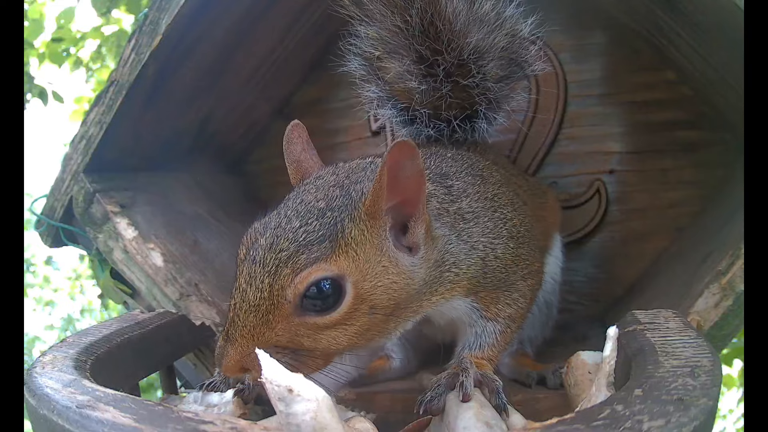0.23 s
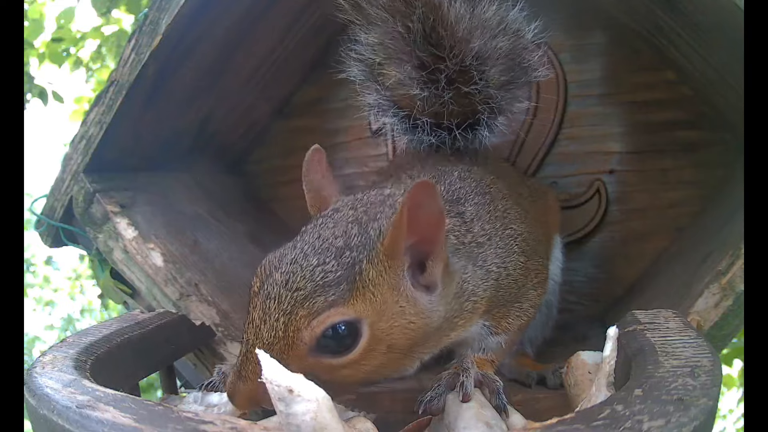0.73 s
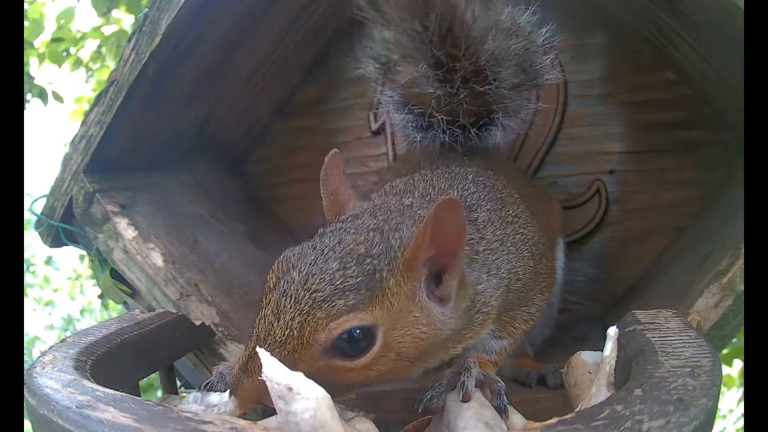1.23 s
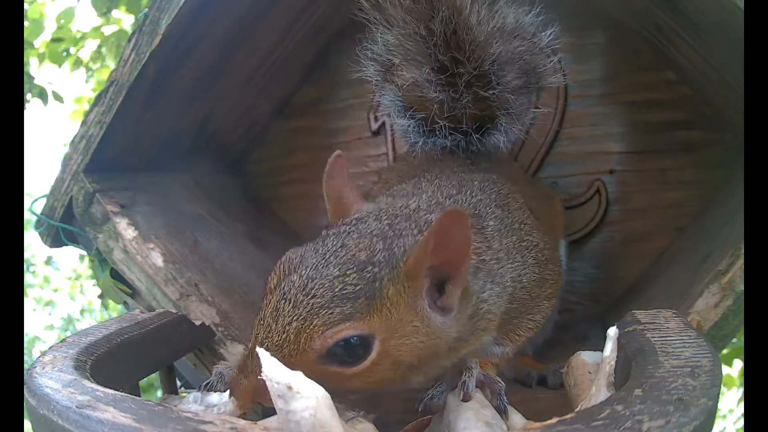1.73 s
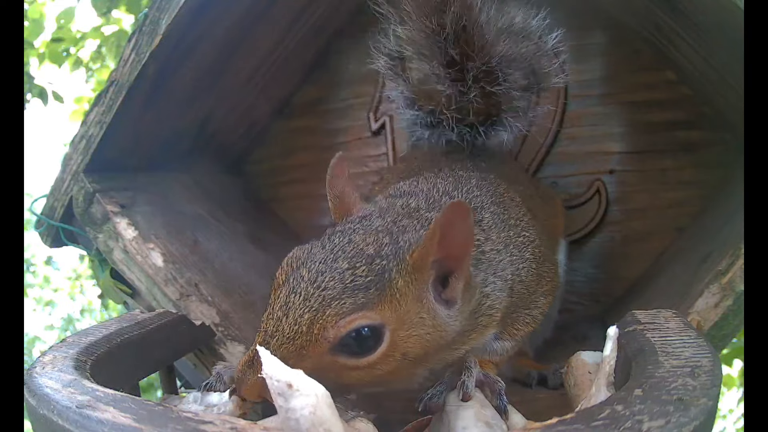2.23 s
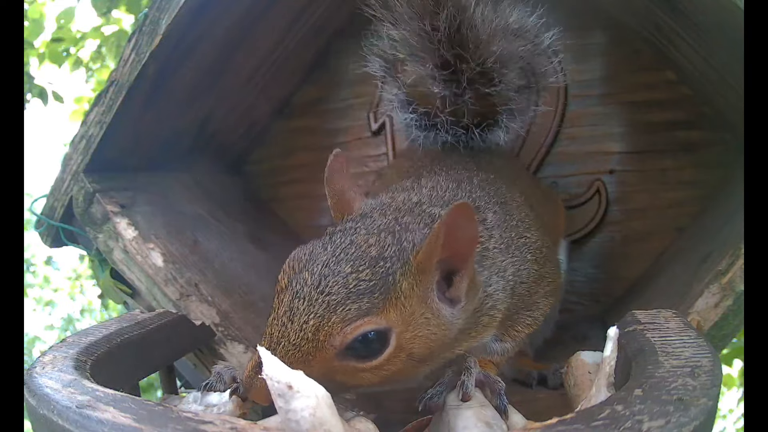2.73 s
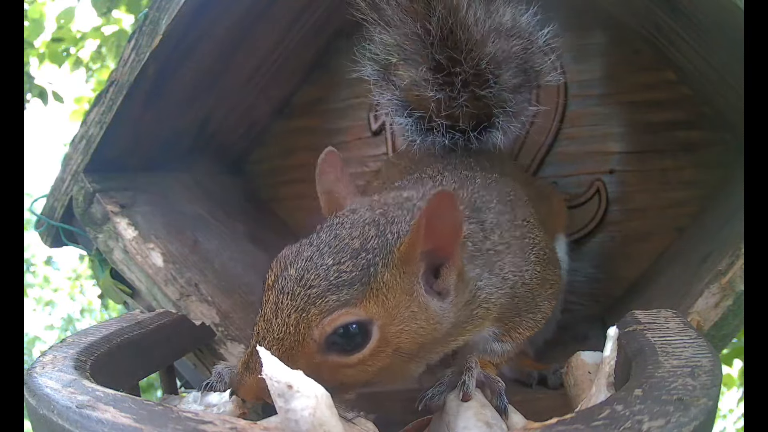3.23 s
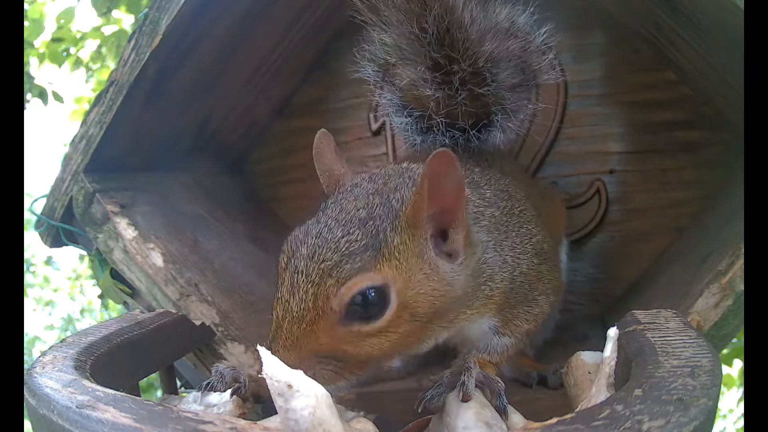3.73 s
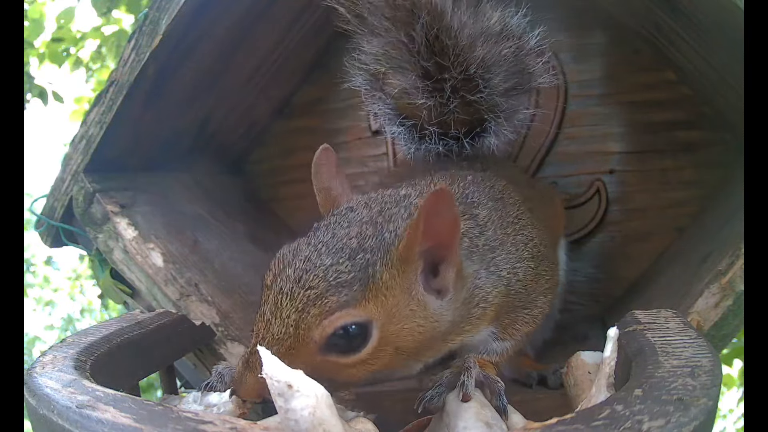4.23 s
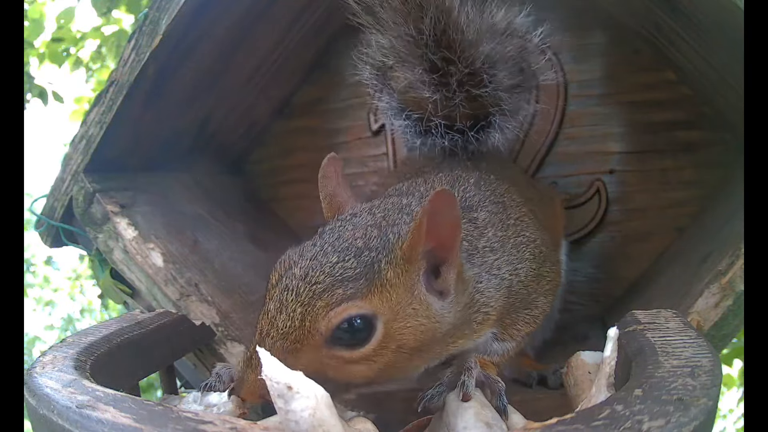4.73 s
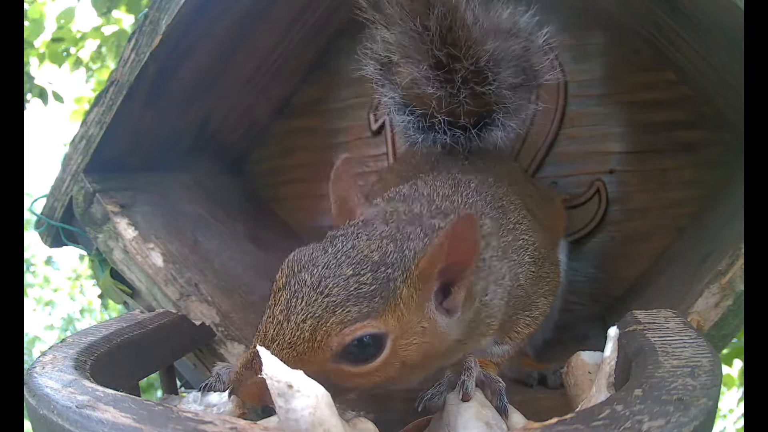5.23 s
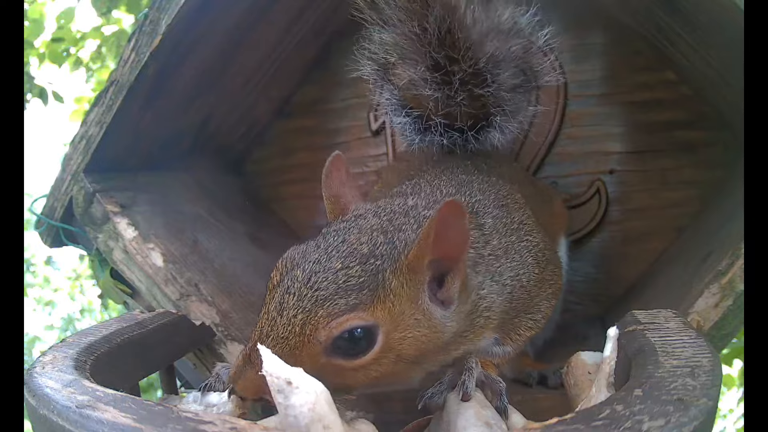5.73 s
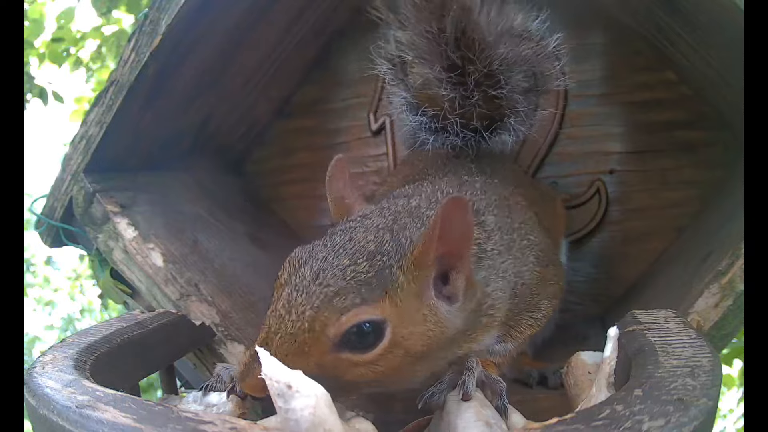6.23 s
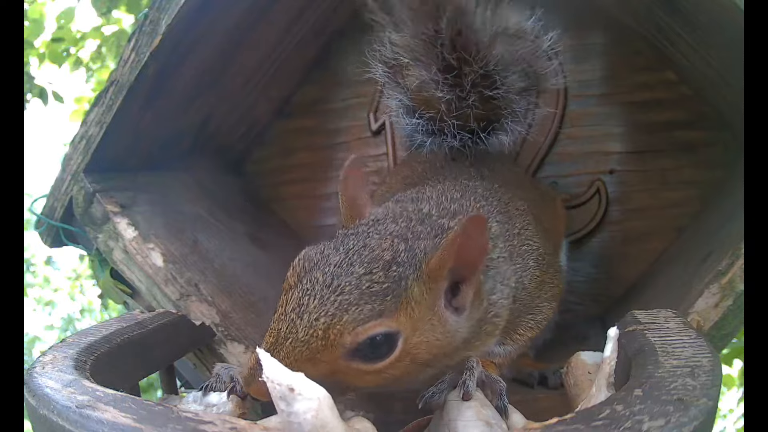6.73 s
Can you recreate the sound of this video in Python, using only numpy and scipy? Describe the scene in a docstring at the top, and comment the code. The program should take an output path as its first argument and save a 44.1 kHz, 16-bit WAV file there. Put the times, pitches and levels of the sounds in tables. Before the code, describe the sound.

A squirrel is heard very close, inside a wooden nest box in a quiet garden. It opens with a clipped, harsh bark right at the start. From about 0.7 seconds its teeth crack and slip on something hard, making dry, irregular clicks with soft thuds through the wall, and a few very faint short hisses. The clicks build until a brief hiss leads into a loud, rasping bark from 2.9 to 3.4 seconds. After a lull, gnawing resumes at 4.3 seconds, sharper now, with a soft wheezy hiss until 4.9 and tiny fibre snaps. Another loud, raspy bark runs from 5.5 to 5.8 seconds. Stronger cracks continue until about 7 seconds, with a longer hiss from 6.1 to 6.7. Everything has a slightly boxy colour. A faint rumble, air noise and hum swell when the squirrel is loud, then sink back.

```python
"""Inside a wooden nest box in a quiet garden, a grey squirrel gnaws, hisses and barks close by.
Three harsh barks: two vocal folds break from one tone into a rasp. Teeth crack and slip on something
hard; fibres snap and the wall thuds. Box and microphone resonances colour the barks and cracks.
Hisses are air forced through a narrowed throat. Behind: faint garden echoes, and rumble,
air noise and hum that swell while the squirrel is loud."""
import sys
import numpy as np
from scipy import signal
from scipy.fft import rfft, irfft, next_fast_len
from scipy.io import wavfile
from scipy.ndimage import uniform_filter1d, minimum_filter1d

SR = 44100
rng = np.random.default_rng(int(sys.argv[2]) if len(sys.argv) > 2 else 0)


def unload_wav(signal):
    """Save mono or channel-first audio to the path in sys.argv[1] as 16-bit WAV at rate SR, clipped to [-1, 1]."""
    wavfile.write(
        sys.argv[1],
        SR,
        np.round(np.clip(np.atleast_2d(signal).T, -1, 1) * 32767).astype(np.int16),
    )


N = 307369
TIME_S = np.arange(N) / SR

# pitch curve per bark: (time [s], pitch [Hz])
BARK_PITCH = [
    [(-.008, 383), (.022, 414), (.04, 430), (.053, 465)],
    [(2.936, 360), (2.962, 458.2), (3.045, 507.6), (3.09, 459.6), (3.125, 501.5), (3.22, 470.1),
     (3.28, 436), (3.36, 467.1), (3.446, 423.6)],
    [(5.465, 369.8), (5.485, 439.4), (5.535, 434.7), (5.58, 494.6), (5.635, 516.9), (5.70, 480.8),
     (5.745, 433.6), (5.785, 441.5), (5.828, 398.5)],
]
# effort curve per bark: (time [s], level [dB], middle share [dB], upper share [dB], top share [dB])
BARK_EFFORT = [
    [(0.006, -20, -2.5, -5.5, -14.5), (0.038, -16, -1, -8, -20), (0.048, -17, -17.5, 3, -29.5)],
    [(2.945, -19.5, -11.5, -3, -22), (2.955, -15.5, -5.5, -6.5, -21), (2.997, -18, -4, -4.5, -18),
     (3.051, -14.5, -7, -2.5, -22), (3.183, -11, -2.5, -3.5, -18.5), (3.207, -11.5, -7.5, -5, -6),
     (3.311, -11, -5.5, -4, -16.5), (3.413, -14.5, -6, -4, -12), (3.44, -18, -10.5, -4, -23)],
    [(5.47, -16.5, -6, -4.5, -19), (5.48, -17, -4, -6, -18), (5.55, -14.5, -2, -10, -22),
     (5.596, -11.5, -0.5, -7, -21.5), (5.768, -10, -5.5, -3, -14.5), (5.8, -12, -4, -5.5, -14.5),
     (5.82, -21, -6.5, -7.5, -15)],
]
# box and microphone resonances that colour the barks: (frequency [Hz], width [Hz], gain [dB])
BARK_RESONANCES = [(274, 68, -29.5), (390, 210, -21.5), (750, 130, -16), (985, 190, -11.5),
                   (1197, 83, -17.5), (1770, 270, 2.5), (2246, 340, -2), (2570, 200, -1), (3176, 470, -1),
                   (3583, 270, 4.5), (4220, 270, -11.5), (5415, 620, -34.5), (6270, 750, -49.5)]
# tooth cracks: (time [s], peak [dB], relative brightness [dB], wall thud level [dB])
CRACKS = [(0.7086, -53, -15, -48), (0.8624, -39.5, -27, -49.5), (0.9004, -32.5, -14, -45),
          (1.0936, -31.5, -37, -45), (1.272, -34, -19, -49), (1.453, -33.5, -27, -51),
          (1.6014, -45.5, -25, -56.5), (1.917, -35, -32, -48.5), (2.0488, -31.5, -36, -57),
          (2.0725, -33, -31, -44), (2.2334, -24.5, -23, -46.5), (2.409, -22, -4.5, -66.5),
          (2.5592, -28.5, -18.5, -43), (2.614, -24.5, -1.5, -46), (2.7544, -19, -14.5, -41.5),
          (2.8673, -32, -17.5, -47), (3.5399, -50.5, -24, -53), (4.3361, -26, -15.5, -48),
          (4.4622, -30, -17, -52.5), (4.6455, -23, -18, -49), (4.8174, -23, -9.5, -54),
          (4.8439, -14.5, -8.5, -46.5), (4.8698, -17, -5, -42.5), (5.0175, -18, -3.5, -50),
          (5.0317, -24.5, -5, -43.5), (5.1658, -32, -25.5, -52), (5.225, -20, -18.5, -44.5),
          (5.3617, -37, -13, -53), (5.4068, -14.5, -4.5, -35), (5.9243, -13.5, -15, -39.5),
          (5.9397, -22.5, -20, -38), (6.0692, -19, -17.5, -49.5), (6.0905, -22, -24, -41.5),
          (6.2474, -22.5, -14, -39), (6.4411, -13, -7.5, -40.5), (6.5944, -19, -19.5, -46),
          (6.6537, -13, -1, -36), (6.785, -29, 0, -45), (6.8104, -12, -20.5, -37), (6.943, -22, -20, -37)]
# tooth slips around a crack: (offset [steps], base peak [dB])
TOOTH_SLIPS = [(-1.8, -48.5), (-1, -42.5), (1, -44.5)]
# gnawing spells: (start [s], end [s], base grinding level [dB], base tick peak [dB])
GNAW_BOUTS = [(1.148, 2.396, -68.5, -55), (4.455, 6.969, -63.5, -45)]
# box and microphone resonances that ring briefly after each crack: (frequency [Hz], gain [dB], t60 [s])
CLICK_MODES = [(926, -12, 0.041), (1145, 1, 0.0062), (1614, 2, 0.027), (1796, 5, 0.023), (2213, 2.5, 0.015),
               (2592, 1, 0.026), (3330, -4.5, 0.0017), (3575, 8, 0.014), (4157, -6, 0.019),
               (4370, -15.5, 0.021)]
# snapping fibres: (time [s], peak [dB])
FIBRE_SNAPS = [(.927, -56), (4.818, -54), (5.035, -38.5), (5.925, -48), (6.441, -46)]
# box wall resonances: (frequency [Hz], width [Hz], gain [dB])
WALL_MODES = [(356, 60, -11), (437.4, 76, 2.5), (490, 236, -8), (800, 640, -24)]
# hisses: (start [s], end [s], level [dB], centre [Hz], drop one octave off centre [dB])
HISS_EVENTS = [(1.11, 1.217, -66, 3380, 120), (1.48, 1.611, -62.5, 2750, 63),
               (1.967, 2.051, -49.5, 2490, 49), (2.352, 2.446, -50.5, 2580, 26),
               (2.866, 2.982, -41, 2497, 5), (4.422, 4.88, -40, 2900, 4.5), (6.069, 6.687, -36.5, 2900, 1)]
# hiss spectrum: (frequency [Hz], relative density [dB])
HISS_SPECTRUM = [(410, -62), (700, -19.5), (899, -32), (1180, -32.5), (1960, -10.5), (2140, -12.5),
                 (2380, -4.5), (2780, -9), (3060, -5), (3430, -5), (3530, -3), (4370, -35), (4630, -38.5),
                 (7000, -50.5), (9100, -85.5), (15400, -120)]
# still-air spectrum: (frequency [Hz], relative density [dB])
AIR_SPECTRUM = [(20, -16), (40, -5.5), (75, -9), (105, -18), (160, -27.5), (250, -25), (450, -32.5),
                (800, -26), (1300, -27.5), (2500, -26), (3400, -27.5), (4400, -38), (7400, -57.5)]
# hum tones: (frequency [Hz], base rms level [dB])
HUM_TONES = [(118.6, -77), (565, -89)]

CLEAR_ROUGHNESS, RASP_ROUGHNESS = .24, .68


def barks():
    """Three harsh barks from the vocal folds."""
    out = np.zeros(N)
    for pitch, effort in zip(BARK_PITCH, BARK_EFFORT):
        add(out, pitch[0][0], bark(pitch, effort))
    return out


def bark(pitch, effort, turbulence=.45, churn_hz=1400, attack_s=.009, release_s=.0058):
    """Fold pulses and turbulent air, coloured by box and microphone resonances."""
    t = np.arange(pitch[0][0], pitch[-1][0], 1 / SR)
    lead_hz, loose_hz, roughness = fold_tuning(pitch, t)
    level_db, *shares_db = curves_at(effort, t)
    pulses, lead_phase = fold_pulses(lead_hz, loose_hz, roughness)
    rush = turbulence * rng.standard_normal(len(t)) * (1 + np.cos(lead_phase))  # air at each opening
    churn = 1.5 * low_pass(rng.standard_normal(len(t)), churn_hz, order=4)
    voice = resonate(pulses + roughness * (rush + churn), BARK_RESONANCES)
    voice = band_balance(box_reflections(voice), shares_db)
    gate = ramp((t - t[0]) / attack_s) * ramp((t[-1] - t) / release_s)
    return hold_power(voice, 400) * from_db(level_db) * gate


def fold_tuning(pitch, t, catch_s=.02, clear_s=.028, break_s=.03, relock_s=.025,
                low_hz=420, high_hz=561, flip_at_s=.18, flip_s=.06,
                squeal_at_s=3.321, squeal_s=.028, squeal_hz=583.6):
    """The folds catch, clear, split into two pitches and relock; once they lock into a squeal."""
    lead_hz, = curves_at(pitch, t)
    age_s = t - t[0]
    squeal = np.exp(-(2 * (t - squeal_at_s) / squeal_s) ** 4)
    apart = ramp((age_s - clear_s) / break_s) * ramp((t[-1] - t) / relock_s) * (1 - squeal)
    lead_hz += squeal * (squeal_hz - lead_hz)
    free_hz = low_hz + (high_hz - low_hz) * ramp((age_s - flip_at_s) / flip_s + .5)  # register flip
    free_hz *= 1 + .04 * wobble(len(t), 14)
    loose_hz = lead_hz + apart * (free_hz - lead_hz)
    catch = ramp(1 - (age_s / catch_s) ** 2)
    roughness = CLEAR_ROUGHNESS + np.maximum(apart, catch) * (RASP_ROUGHNESS - CLEAR_ROUGHNESS)
    return lead_hz, loose_hz, roughness


def fold_pulses(lead_hz, loose_hz, roughness, wander=.01, jitter=.026, shimmer=.7, coupling=.05):
    """Two unsteady folds pull each other's closures early or late; returns pulses and lead phase."""
    def phase(hz):
        cycles = np.cumsum(hz * (1 + wander * roughness * wobble(len(hz), 70))) / SR
        return 2 * np.pi * (cycles + jitter * roughness * wobble(len(hz), 170))

    def closures(own, other):
        pulled = own + 2 * np.pi * coupling * roughness * np.sin(other)
        return unit_rms(np.cos(np.outer(pulled, np.arange(1, 17))).sum(axis=1))

    lead, loose = phase(lead_hz), phase(loose_hz)
    pulses = closures(lead, loose) + 1.3 * roughness * closures(loose, lead)
    pulses *= 1 + shimmer * roughness * wobble(len(lead), 240)
    fundamental = .93 * (RASP_ROUGHNESS - roughness) * np.cos(lead)  # fuller when locked
    return pulses + fundamental, lead


def band_balance(voice, shares_db, edges_hz=(2050, 2900, 3950)):
    """The bark's power shifts between four bands; the lowest takes the remainder."""
    below = [shape_spectrum(voice, lambda hz: 1 / (1 + (hz / edge) ** 50)) for edge in edges_hz]
    bands = np.diff([0 * voice, *below, voice], axis=0)
    shares = from_db(shares_db)
    lowest = np.sqrt(np.clip(1 - np.sum(shares ** 2, axis=0), .08, 1))
    return sum(share * hold_power(band, 1400) for share, band in zip([lowest, *shares], bands))


def box_reflections(x, lags_s=(.0009, .0014, .0021), bounce=.38):
    """Reflections between close walls fill the gaps between pulses (allpasses)."""
    for lag_s in lags_s:
        loop = np.r_[1, np.zeros(round(lag_s * SR)), bounce]
        x = signal.lfilter(loop[::-1], loop, x)
    return x


def gnawing(lead_s=.0016, slip_step_s=.021, slip_spread_db=4, ticks_per_s=3):
    """Teeth crack something hard amid soft, dull slips; more slips tick at random through each bout."""
    out = np.zeros(N)
    slips = [tooth_stroke(bright_db=-22, crumble_s=.0025) for _ in range(10)]
    mean_peak_db = np.mean([crack[1] for crack in CRACKS])
    slip_events = []
    for at_s, peak_db, bright_db, _ in CRACKS:
        add(out, at_s - lead_s, from_db(peak_db) * tooth_stroke(bright_db, crumble_s=.001))
        for steps, base_db in TOOTH_SLIPS:
            offset_s = steps * slip_step_s * rng.uniform(.55, 1.4)
            slip_events.append((at_s + offset_s, base_db + .5 * (peak_db - mean_peak_db)))
    for start_s, end_s, _, tick_db in GNAW_BOUTS:
        count = int(ticks_per_s * (end_s - start_s))
        slip_events += [(at_s, tick_db) for at_s in rng.uniform(start_s, end_s, count)]
    for at_s, level_db in slip_events:
        gain = from_db(level_db + slip_spread_db * rng.standard_normal())
        add(out, at_s, gain * slips[rng.integers(len(slips))])
    return low_pass(out, 4150, order=16)


def tooth_stroke(bright_db, crumble_s, mode_spread_db=2.5, crack_db=36, crack_hz=4000):
    """A tooth breaks through with a dry crack, crumbs follow, box and microphone ring; unit peak."""
    t = np.arange(SR // 16) / SR
    force = .6 * np.exp(-t / crumble_s) * rng.standard_normal(len(t))
    force[0] += 2
    force += np.roll(force, rng.integers(SR // 1000, SR // 250)) * rng.uniform(0, .81)  # second break
    mode_hz, mode_db, t60_s = np.transpose(CLICK_MODES)
    mode_db = mode_db + mode_spread_db * rng.standard_normal(len(mode_hz))
    modes = np.sin(2 * np.pi * np.outer(t, mode_hz)) * from_db(mode_db - 60 * t[:, None] / t60_s)
    ring = modes @ (-1) ** np.arange(len(mode_hz))  # alternating polarity
    crack = from_db(crack_db) * low_pass(np.diff(force, prepend=0), crack_hz, order=6)
    sound = np.pad(signal.fftconvolve(force, ring)[:len(t)] + crack, (40, 0))
    treble_db = .97 * bright_db + 11  # clean break bright, crush dull
    sound = shape_spectrum(sound, lambda hz: from_db(treble_db * ramp((hz - 2400) / 1000)))
    return sound / np.abs(sound).max()


def splinters(centre_hz=5700, width_hz=1100, decay_s=.0024):
    """Thin fibres snap with a bright tick."""
    out = np.zeros(N)
    t = np.arange(SR // 30) / SR
    for at_s, peak_db in FIBRE_SNAPS:
        burst = rng.standard_normal(len(t)) * np.exp(-t / decay_s)
        tick = resonate(burst, [(centre_hz, width_hz, 0)])
        add(out, at_s, from_db(peak_db) * tick / np.abs(tick).max())
    return out


def box_wall(thud_gain_db=-2, rise_s=.009, tug_gain_db=-11, tug_s=.02, swing_db=6, swing_hz=9):
    """Bites thud through the wall; tugging and grinding make it rumble softly."""
    power = np.zeros(N)
    t = np.arange(SR // 5) / SR
    thud = t / rise_s * np.exp(1 - t / rise_s)
    tug = np.exp(-np.abs(t - t.mean()) / tug_s)
    for at_s, _, _, thud_db in CRACKS:
        add(power, at_s, (from_db(thud_db + thud_gain_db) * thud) ** 2)
        add(power, at_s - t.mean(), (from_db(thud_db + tug_gain_db) * tug) ** 2)
    drift_db = swing_db * np.tanh(wobble(N, swing_hz))
    for start_s, end_s, grind_db, _ in GNAW_BOUTS:
        power += from_db(grind_db + drift_db) ** 2 * (TIME_S > start_s) * (TIME_S < end_s)
    return hold_power(resonate(rng.standard_normal(N), WALL_MODES), 1200) * np.sqrt(power)


def hisses(wheeze_hz=492, wheeze_fall=.028, flutter_db=.8, puff_half_s=.065, puff_db=-47):
    """Air forced through the narrowed throat, with a sinking wheeze; a puff also ends each bark."""
    out = np.zeros(N)
    bark_ends_s = [pitch[-1][0] for pitch in BARK_PITCH]
    puffs = [(at_s - puff_half_s, at_s + puff_half_s, puff_db, 2700, 0) for at_s in bark_ends_s]
    for start_s, end_s, level_db, centre_hz, drop_db in HISS_EVENTS + puffs:
        def colour(hz):
            octaves = np.log2(np.clip(hz, 1000, 6000) / centre_hz)
            return spectrum_gain(HISS_SPECTRUM, hz) * from_db(-drop_db * octaves ** 2)

        i = np.arange(int((end_s - start_s) * SR))
        progress = i / len(i)
        air = rng.standard_normal(len(i))
        lag_samples = SR / (wheeze_hz * (1 - wheeze_fall * progress ** 2))
        air += .7 * np.interp(i - lag_samples, i, air)  # comb gives the wheeze
        envelope = np.sin(np.pi * progress) ** .59 * from_db(level_db - flutter_db * wobble(len(i), 40))
        add(out, start_s, unit_rms(shape_spectrum(air, colour)) * envelope)
    return out


def garden_echoes(x, t60_s=.26, cutoff_hz=7000, build_s=.022, slap_s=.006):
    """Scattered echoes and one slap off a nearby surface return through the opening."""
    t = np.arange(int(.7 * SR)) / SR
    echoes = rng.standard_normal(len(t)) * from_db(-60 * t / t60_s) * ramp(t / build_s)
    echoes = low_pass(echoes, cutoff_hz)
    echoes /= np.sqrt(np.sum(echoes ** 2))
    echoes[round(slap_s * SR)] += .4
    return signal.fftconvolve(x, echoes)[:N]


def background(squirrel, air_base_db=-71.5, rest_db=1.5, range_db=19, knee_db=-42, linger_s=.078):
    """Rumble, thin air noise and hum swell while the squirrel is loud, then sink back."""
    pole = np.exp(-1 / (linger_s * SR))
    power = np.abs(uniform_filter1d(squirrel ** 2, size=2000))
    activity = signal.lfilter([1 - pole], [1, -pole], power / (power + from_db(2 * knee_db)))
    swell_db = rest_db + range_db * np.sqrt(activity)
    air = shape_spectrum(rng.standard_normal(N), lambda hz: spectrum_gain(AIR_SPECTRUM, hz))
    air = from_db(air_base_db) * unit_rms(air)
    rumble = shape_spectrum(air, lambda hz: 1 / (1 + (hz / 400) ** 2))
    hum = sum(np.sqrt(2) * from_db(db) * np.sin(2 * np.pi * hz * TIME_S + .2 * wobble(N, 4))
              for hz, db in HUM_TONES)
    return rumble * from_db(swell_db) + (air - rumble + hum) * from_db(.6 * swell_db)


def from_db(db):
    """Decibels to gain."""
    return 10 ** (np.asarray(db) / 20)


def ramp(x):
    """Clip to 0..1."""
    return np.clip(x, 0, 1)


def unit_rms(x):
    """Scale to unit power."""
    return x / np.sqrt(np.mean(x ** 2) + 1e-20)


def hold_power(x, window_samples):
    """Hold short-time power at one."""
    return x / np.sqrt(np.abs(uniform_filter1d(x ** 2, window_samples)) + 1e-12)


def curves_at(rows, t):
    """Interpolate each value column at times t."""
    times_s, *columns = np.transpose(rows)
    return [np.interp(t, times_s, column) for column in columns]


def shape_spectrum(x, gain_at):
    """Zero-phase filter with gain gain_at(hz)."""
    size = next_fast_len(len(x) + 2000, True)
    hz = np.maximum(np.arange(size // 2 + 1) * SR / size, 1)
    return irfft(rfft(x, size) * gain_at(hz), size)[:len(x)]


def spectrum_gain(points, hz):
    """Gain at hz from (frequency [Hz], level [dB]) points."""
    points_hz, db = np.transpose(points)
    return from_db(np.interp(np.log(hz), np.log(points_hz), db))


def resonate(x, modes):
    """Steep-sided minimum-phase resonances, summed in power."""
    size = next_fast_len(len(x) + 4000)
    hz = np.abs(np.fft.fftfreq(size, 1 / SR))
    power = sum(from_db(2 * db) / (1 + 2 * ((hz - centre_hz) / width_hz) ** 2) ** 3
                for centre_hz, width_hz, db in modes)
    response = np.exp(np.conj(signal.hilbert(np.log(power) / 2)))
    return np.fft.ifft(np.fft.fft(x, size) * response).real[:len(x)]


def low_pass(x, hz, order=2):
    """Causal Butterworth low-pass."""
    return signal.sosfilt(signal.butter(order, hz, fs=SR, output="sos"), x + 1e-18)


def wobble(count, rate_hz):
    """Smooth random drift, unit rms."""
    return unit_rms(shape_spectrum(rng.standard_normal(count), lambda hz: 1 / (1 + (hz / rate_hz) ** 2)))


def add(out, at_s, x):
    """Mix x into out at at_s."""
    i = round(at_s * SR)
    x, i = x[max(-i, 0):], max(i, 0)
    out[i:i + len(x)] += x[:max(N - i, 0)]


def scene():
    """Close squirrel, garden echoes, background; mono."""
    squirrel = barks() + hisses() + gnawing() + splinters() + box_wall()
    return (squirrel + from_db(-33.5) * garden_echoes(squirrel) + background(squirrel))[None]


def record(dry, ceiling=.9, cutoff_hz=7500):
    """Fast peak limiter, then a steep low-pass."""
    allowed_gain = np.minimum(1, ceiling / (np.abs(dry) + 1e-9))
    gain = uniform_filter1d(minimum_filter1d(allowed_gain, size=121), size=121)
    return signal.sosfilt(signal.ellip(10, .1, 80, cutoff_hz, fs=SR, output="sos"), dry * gain)


dry = scene()
out = record(dry)
unload_wav(out)
```